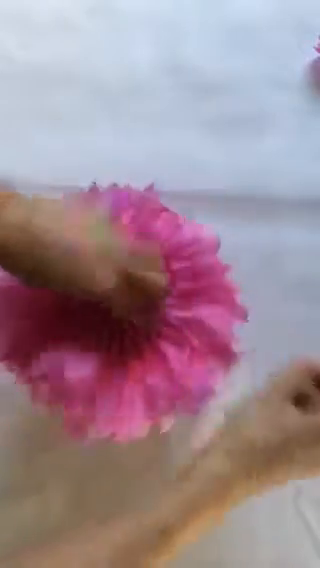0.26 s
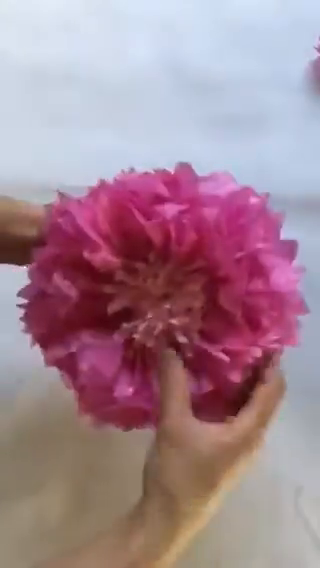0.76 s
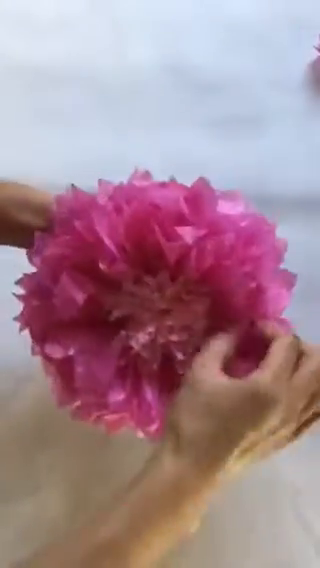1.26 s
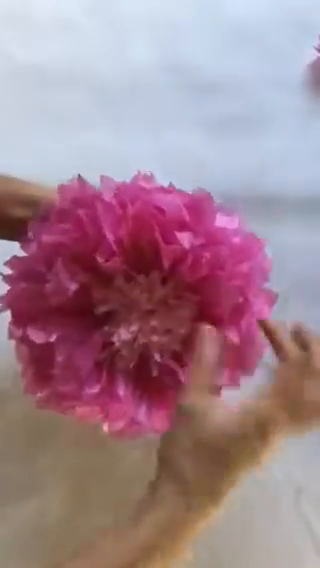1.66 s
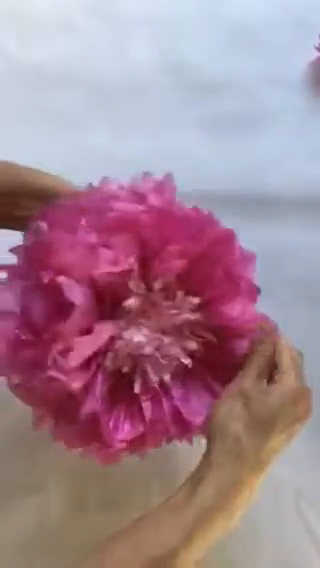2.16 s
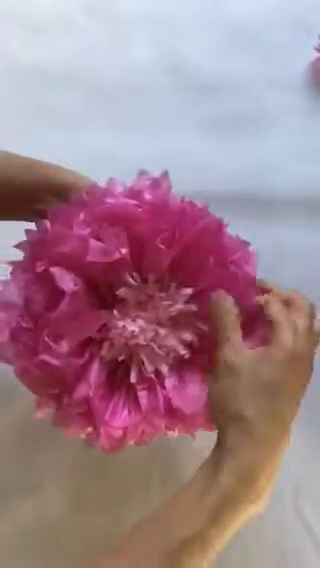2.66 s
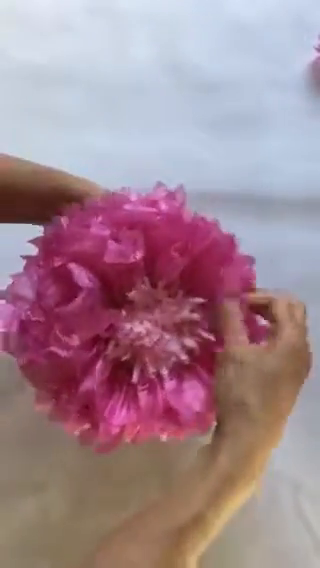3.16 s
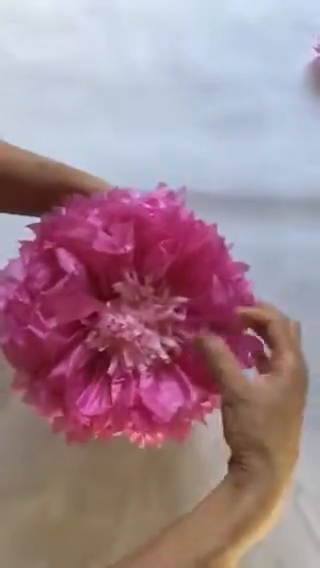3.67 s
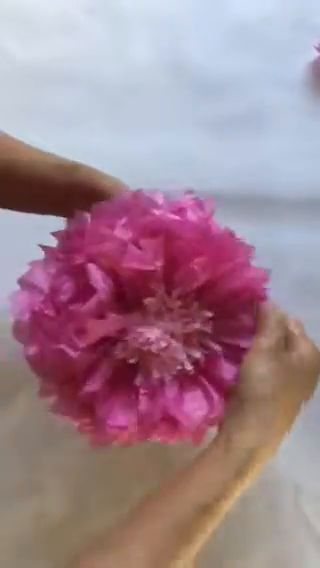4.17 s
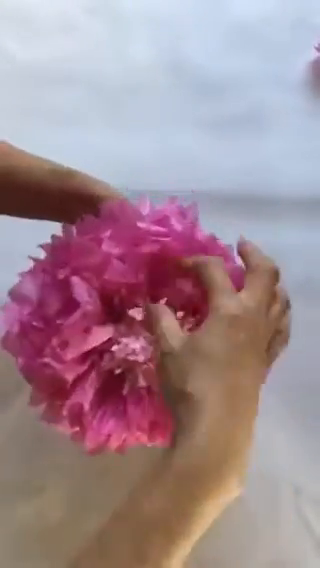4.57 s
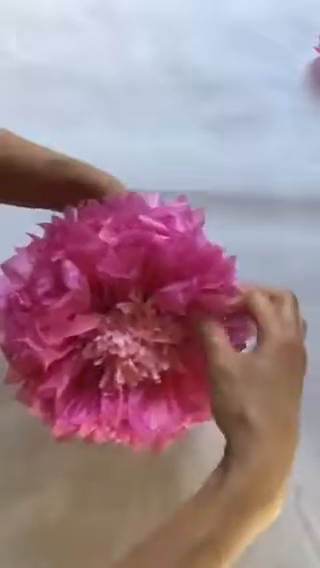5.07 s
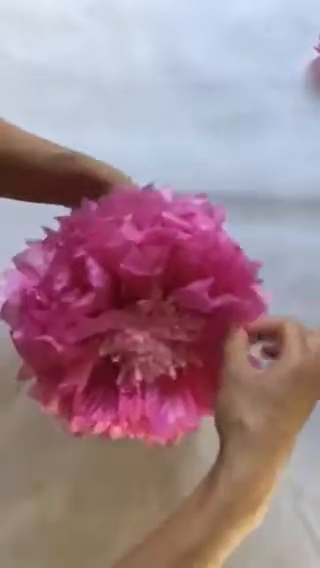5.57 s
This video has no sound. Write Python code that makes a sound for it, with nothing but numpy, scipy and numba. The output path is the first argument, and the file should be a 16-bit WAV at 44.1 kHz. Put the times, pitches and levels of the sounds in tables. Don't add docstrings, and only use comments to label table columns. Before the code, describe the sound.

Thin tissue paper crackles sharply and dryly as fingers pull and fluff its layers, with bright snaps and soft thuds in a small room.

```python
import sys
import numpy as np
from scipy import signal
from scipy.fft import rfft, irfft
from scipy.io import wavfile
from scipy.ndimage import uniform_filter1d, map_coordinates
from numba import njit

SR = 44100
rng = np.random.default_rng(int(sys.argv[2]) if len(sys.argv) > 2 else 0)


def convert_level_to_amplitude(level_db):
    exponent = np.asarray(level_db, float) / 20
    return 10 ** exponent


def dump(signal):
    limited = np.clip(np.atleast_2d(signal).T, -1, 1)
    pcm = np.round(limited * 32767).astype(np.int16)
    wavfile.write(sys.argv[1], SR, pcm)


N = 257103

# (frequency [Hz], density [dB per Hz])
HISS_SPECTRUM = [
    (30, -14),
    (120, -8),
    (240, -1.5),
    (320, -3.5),
    (1100, -5),
    (4800, -22.5),
    (14000, -55),
    (17000, -61),
]
# (time [s], level [dB])
HUM_SWELL = [(0, -68), (.23, -58.5), (.36, -68), (.53, -68.5), (.92, -74), (1.2, -70), (1.32, -73),
             (2.18, -72), (2.32, -67), (2.9, -82), (3.13, -62), (3.41, -70), (3.59, -60.5), (4.01, -73),
             (4.11, -84), (4.37, -60.5), (5.3, -72), (5.83, -60)]
# (frequency [Hz], T60 [s])
ROOM_DECAY = [
    (200, 0.3),
    (1500, 0.99),
    (6000, 0.5),
    (15000, 0.045),
]
# (time [s], peak [dB], pitch [Hz])
BALL_SHIFTS = [(0.191, -69, 258), (0.194, -44, 209), (0.904, -46.5, 253), (1.014, -48.5, 258),
               (0.247, -58, 94), (1.701, -57.5, 182), (1.73, -56.5, 88.5), (1.79, -57.5, 121),
               (1.98, -47.5, 256), (2.088, -58, 188), (2.601, -61, 154.4), (2.754, -56, 227),
               (3.166, -57.5, 233), (3.389, -58, 140), (3.758, -71, 72.7), (4.204, -59, 238.2),
               (4.365, -65, 211), (4.5, -59, 167), (5.32, -49, 272), (5.681, -66, 258)]
# (time [s], peak [dB], pitch [Hz], larger folds relative [dB])
LOUD_CREASES = [(.208, -15, 12000, -20), (.2372, -13, 10600, -8), (.2674, -21, 14200, -9.5),
                (1.3858, -16.5, 14400, -17), (1.443, -16.5, 13300, -30), (1.9402, -24, 12300, 2),
                (1.9976, -13.5, 9900, -18), (2.258, -19, 14800, -22), (2.753, -20.5, 14500, -19),
                (2.7936, -29, 13900, -21), (2.916, -16.5, 11800, -30), (3.291, -25, 14400, -11),
                (3.8082, -17, 15000, -10), (4.0063, -21, 14300, -19), (4.049, -8, 14200, -27),
                (4.0853, -15, 14600, -18), (4.094, -18, 14500, -15), (4.225, -27, 13970, -16),
                (4.267, -16, 14500, -5), (4.6588, -23.5, 12100, 6), (5.044, -19, 12800, -25),
                (5.072, -20.5, 12600, -14), (5.0904, -15, 14000, -9), (5.1223, -16, 14200, -26),
                (5.164, -12, 14300, -16), (5.1915, -16, 14000, -3.5), (5.2096, -15, 13500, -2),
                (5.613, -17, 12800, -22), (5.6665, -29, 14800, -26), (5.69, -26, 14300, -8)]
# (time [s], peak [dB])
LESSER_CREASES = [(.2544, -17), (.289, -15), (.5254, -42), (.782, -38), (0.8123, -26.5), (1.505, -32),
                  (1.559, -15), (1.6848, -52), (1.9013, -30), (2.006, -18), (2.115, -27), (2.2046, -24),
                  (2.519, -48), (2.635, -25), (2.787, -29), (3.308, -20), (3.4002, -18), (3.421, -24),
                  (3.4615, -32), (3.5259, -42), (3.9965, -31), (4.237, -23), (4.5236, -50), (4.7947, -19),
                  (4.8133, -19), (4.8642, -20.5), (4.9391, -23), (5.1587, -13.5), (5.162, -22),
                  (5.343, -34)]
# (time [s], peak [dB], pitch [Hz], larger folds relative [dB])
LONE_CREASES = [(.1377, -30, 14600, -13), (0.396, -15.5, 15000, -27), (0.4258, -22, 14300, -16),
                (0.468, -26, 14000, -1), (.5095, -34, 14600, -12), (0.6052, -34, 9300, -1),
                (0.6758, -35.5, 8000, 3), (.7602, -29.5, 14900, -8), (0.829, -21, 14400, -7.5),
                (1.1242, -28, 14000, -27), (1.745, -43.5, 8100, 8.5), (1.7687, -41.5, 10600, 9.5),
                (1.8015, -32, 12500, -12), (2.4934, -41, 10800, -4), (2.5625, -36, 14300, 0),
                (3.12, -44, 7100, -27), (3.152, -33, 14900, -20), (3.5003, -31, 10500, -6),
                (3.8964, -25, 14800, -17), (3.911, -25, 14600, -20), (3.9705, -24, 13300, -16),
                (4.4086, -29, 14600, -19), (4.441, -32, 14100, -25), (4.467, -30, 13500, -0.5),
                (4.58, -42, 10200, 5), (4.617, -33, 14500, -28), (5.389, -21, 14500, -18),
                (5.4697, -16.5, 12100, -25), (5.5066, -15, 14300, -27), (5.8168, -23.5, 9200, -25)]
# (start [s], length [s], level at the grip [dB], level at letting go [dB])
PULL_MOVES = [(0, 0.15, -57.5, -74), (0.136, 0.031, -53.5, -37.5), (0.178, 0.098, -33, -30),
              (0.329, 0.2, -50, -53), (0.557, 0.32, -57.5, -56), (.836, 0.11, -42.5, -28),
              (0.928, .11, -30, -31.5), (1.249, 0.34, -44.5, -37.5), (1.892, 0.23, -38.5, -38),
              (2.131, 0.13, -41.5, -42), (2.253, 0.11, -43.5, -56), (2.36, 0.074, -40, -40),
              (2.637, 0.091, -38.5, -40.5), (2.744, 0.09, -43.5, -38.5), (2.849, 0.13, -46, -39),
              (3.173, 0.23, -43, -35.5), (3.393, 0.063, -35, -45), (3.717, 0.2, -50, -47.5),
              (3.957, 0.15, -46, -31), (4.056, 0.25, -38.5, -38.5), (4.315, 0.081, -38, -54),
              (4.438, 0.13, -60.5, -65.5), (4.61, 0.15, -41, -37.5), (4.83, .1, -48.5, -47),
              (4.933, 0.06, -49, -36), (5.052, 0.11, -49, -38.5), (5.167, 0.14, -35, -52),
              (5.398, 0.15, -54.5, -38.5), (5.522, 0.092, -38, -33), (5.667, 0.15, -40.5, -48)]
# (time [s], level [dB])
TUG_MOVES = [(.288, -36), (.401, -49), (1.396, -33.5), (1.53, -46), (1.931, -36), (2.1, -34.5),
             (2.802, -36.5), (3.213, -32), (3.335, -33.5), (3.79, -40.5), (3.905, -49), (4.296, -33.5),
             (4.656, -34.5), (4.719, -33), (4.782, -38), (4.885, -43), (5.035, -36), (5.082, -34.5),
             (5.166, -47), (5.332, -39.5), (5.615, -34.5), (5.691, -39)]
# (time [s], depth into the ball [dB], sheets swung [dB])
FINGER_REACH = [(0, 2, -10), (.25, -2, 6.5), (.6, 5, -3.5), (.95, 0.5, 1.5), (1.55, 1.5, 1),
                (1.95, -1, -0.5), (2.3, 3.5, 5), (2.68, -2, -2), (3.08, -1, -0.5), (3.35, 0.5, 2),
                (3.63, -3.5, -10), (3.85, 1.5, 1), (4.05, 1.5, -2), (4.3, 5.5, 5.5), (4.7, -1, -2.5),
                (5.1, -2.5, 0.5), (5.5, 1, -1), (5.83, 1.5, -0.5)]
# (time [s], factor on the scatter of crease sizes [-])
DRYNESS = [
    (0, .8),
    (1.0, .55),
    (1.7, 1.1),
    (2.6, .9),
    (3.3, .75),
    (4.1, 1.0),
    (5.15, 1.45),
    (5.83, 1.1),
]
# (frequency [Hz], density [dB per Hz])
PAPER_VOICE = [(59, -27), (100, -17.5), (204, -7), (291, -8.5), (337, -1), (407, -4), (646, -1.5),
               (780, -6), (1490, 3.5), (2000, -2.5), (2630, 0.5), (4940, -1), (5840, 2.5), (10500, 5),
               (15000, 10)]
FOLD_PITCHES = (330, 1450, 3200, 8000)
FOLD_DULLING = (0.49, 0.2, 0.23)
FOLD_TRIM = (3, 3, 2.95)

HISS_DB = -72
RUMBLE_DB, RUMBLE_SWAY_DB = -74, 1.5
ROOM_DB = -15.5
CREAK_HZ, CREAK_FOLD_DB = 13500, -13
SWARM_MS, LONE_SWARM_MS = 2.5, 4.0
CREASES_PER_S = 9000
TOUCH_DB, TOUCH_DB_PER_S = -12.5, 550
GRIP_DB_PER_S, LET_GO_DB_PER_S = 2000, 707
SETTLE_DB, SETTLE_DB_PER_S = -22, 65
TUG_RISE_DB_PER_S, TUG_FALL_DB_PER_S = 221, 233
TUG_LEAD_S, TUG_TRAIL_S = 0.043, 0.047
USUAL_DB, GENTLE_DB = -38, -58
DEPTH_SHARE = 0.72
TOP_HZ = 15720


def level(x, db):
    return x * convert_level_to_amplitude(db) / np.sqrt(np.mean(x ** 2))


def on_log_hz(hz, table):
    f, v = np.transpose(table)
    return np.interp(np.log(np.maximum(hz, 1)), np.log(f), v)


def colour(x, table):
    size = 4096
    hz = np.arange(size // 2 + 1) * SR / size
    cepstrum = irfft(np.log(convert_level_to_amplitude(on_log_hz(hz, table))))
    cepstrum[1:size // 2] *= 2
    cepstrum[size // 2 + 1:] = 0
    impulse = irfft(np.exp(rfft(cepstrum)))
    return signal.fftconvolve(x, impulse)[:len(x)]


def filtered(x, order, hz, kind):
    return signal.sosfilt(signal.butter(order, hz, kind, fs=SR, output="sos"), x)


def walk(rate):
    hold = max(int(SR / rate), 2)
    steps = np.repeat(rng.standard_normal(N // 8), hold)[:N]
    return uniform_filter1d(steps, hold // 2 + 1)


@njit
def rings(length, start, pole, size):
    out = np.zeros(length)
    for k in range(len(start)):
        z, i = size[k] + 0j, start[k]
        end = min(length, i + int(np.log(300.) / -np.log(abs(pole[k]))) + 1)
        while i < end:
            out[i] += z.real
            z *= pole[k]
            i += 1
    return out


def grains(s, hz, cycles, size):
    hz = np.clip(hz, 50, .45 * SR)
    pole = np.exp((2j * np.pi - 1 / np.clip(cycles, .2, 30)) * hz / SR)
    return rings(N, (s * SR).astype(np.int64), pole, size + 0j)


def background():
    t = np.arange(N) / SR
    hiss = level(colour(rng.standard_normal(N), HISS_SPECTRUM), HISS_DB)
    narrow = filtered(rng.standard_normal(N), 2, [45, 54], "band")
    wide = filtered(rng.standard_normal(N), 2, [58, 125], "band")
    rumble = level(wide, RUMBLE_DB) * convert_level_to_amplitude(RUMBLE_SWAY_DB * walk(8.6))
    hum = level(narrow, -2) + convert_level_to_amplitude(0.5) * np.sin(2 * np.pi * 49 * t)
    hum = hum * convert_level_to_amplitude(np.interp(t, *np.transpose(HUM_SWELL)))
    motor = convert_level_to_amplitude(-76) * np.sin(2 * np.pi * 240 * t)
    return hiss + rumble + hum + motor


def tail(t60_s, length_s):
    t = np.arange(int(length_s * SR)) / SR
    h = rng.standard_normal(len(t)) * np.exp(-np.log(1000) * t / t60_s)
    return h / np.sqrt(np.sum(h ** 2))


def room(x):
    h = 0
    for low in 100 * 2 ** np.arange(0, 7.5, 1.):
        noise = tail(on_log_hz(2.25 * low, ROOM_DECAY), 0.73)
        octave = filtered(noise, 2, [low, min(2 * low, .45 * SR)], "band")
        h = h + octave * np.sqrt(.5 * SR / low)
    h = colour(h, [(100, -23), (22050, 0)])
    h = np.concatenate([np.zeros(int(.004 * SR)), h])
    return convert_level_to_amplitude(ROOM_DB) * signal.fftconvolve(x, h)[:N]


def thuds():
    s, db, hz = np.transpose(BALL_SHIFTS)
    x = grains(s, hz, 1.67, -1j * convert_level_to_amplitude(db + 4.0))
    return filtered(x, 2, 350, "low")


def snaps(count=16, after_db=-4.0, lead=0.051):
    creaks = [(*c, CREAK_HZ, CREAK_FOLD_DB) for c in LESSER_CREASES]
    s, db, hz, fold_db = np.transpose(LOUD_CREASES + creaks + LONE_CREASES)
    in_pull = np.arange(len(s)) < len(s) - len(LONE_CREASES)
    swarm_ms = np.where(in_pull, SWARM_MS, LONE_SWARM_MS)
    u = rng.random((len(s), 1 + 3 * count)).T
    tick = grains(s, hz, 3.9, convert_level_to_amplitude(db - 3.0) * np.exp(2j * np.pi * u[0]))
    late, pitch, turn = u[1:].reshape(3, count, -1)
    late = (1 + lead) * late - lead
    near_hz = 1200 + 15000 * pitch ** .6
    large_db = fold_db + 2.0 + 3 * np.log2(near_hz / 3000)
    fine_db = -6.5 * np.abs(np.log2(near_hz / hz))
    size_db = db + after_db - 9 * np.abs(late) + np.where(near_hz < 5000, large_db, fine_db)
    at = s + swarm_ms * late / 1000
    size = convert_level_to_amplitude(size_db) * np.exp(2j * np.pi * turn)
    swarm = grains(at.ravel(), near_hz.ravel(), 1.08, size.ravel())
    return filtered(tick + swarm, 2, 1100, "high")


def handling(s):
    start, length, first, last = np.transpose(PULL_MOVES)[:, :, None]
    since, after = s - start, s - start - length
    drag = first + (last - first) * np.clip(since / length, 0, 1)
    fade = np.maximum(-LET_GO_DB_PER_S * after, SETTLE_DB - SETTLE_DB_PER_S * after)
    grip = np.maximum(GRIP_DB_PER_S * since, TOUCH_DB + TOUCH_DB_PER_S * since)
    pulls = drag + np.minimum(grip, 0) + np.minimum(fade, 0)
    peak, db = np.transpose(TUG_MOVES)[:, :, None]
    tugs = db + np.minimum(TUG_RISE_DB_PER_S * (s - peak), TUG_FALL_DB_PER_S * (peak - s))
    tugs = tugs + np.minimum(GRIP_DB_PER_S * (s - peak + TUG_LEAD_S), 0)
    tugs = tugs + np.minimum(LET_GO_DB_PER_S * (peak + TUG_TRAIL_S - s), 0)
    return np.maximum(pulls.max(axis=0), tugs.max(axis=0))


def avalanche(count, fade_s):
    u = rng.random((count, 2)).T
    kicks = np.bincount((u[0] * (N - 1)).astype(int), -np.log(u[1] + .01), N)
    stress = signal.lfilter([1], [1, -np.exp(-1 / (fade_s * SR))], kicks)
    x = np.log(stress + .15)
    return (x - x.mean()) / x.std()


def layers(x, pocket_db=2.0):
    hz, s, z = signal.stft(x, SR, nperseg=512, noverlap=384)
    t, depth, swing = np.transpose(FINGER_REACH)
    gentle = USUAL_DB - np.maximum(handling(s), GENTLE_DB)
    reach = [np.interp(s, t, c) for c in (swing, depth, DEPTH_SHARE * depth)]
    rel_db = [r + d * gentle + trim for r, d, trim in zip(reach, FOLD_DULLING, FOLD_TRIM)]
    rel_db = np.array(rel_db + [0 * s])
    place = np.interp(np.log(hz + 1), np.log(np.array(FOLD_PITCHES)), np.arange(len(FOLD_PITCHES)))
    rows, cols = np.meshgrid(place, np.arange(len(s)), indexing="ij")
    gain_db = map_coordinates(rel_db, [rows, cols], order=1)
    pockets = rng.standard_normal((48, 72))
    rows, cols = np.meshgrid(47 * np.sqrt(hz / hz[-1]), 71 * s / s[-1], indexing="ij")
    gain_db = gain_db + pocket_db * map_coordinates(pockets, [rows, cols], order=1)
    return signal.istft(z * convert_level_to_amplitude(gain_db), SR, nperseg=512, noverlap=384)[1][:N]


def crackle(spread_db=2.4, swarm_db=1.7):
    count = int(CREASES_PER_S * N / SR)
    u = rng.random((count, 5)).T
    s = u[0] * (N - 1) / SR
    at = (s * SR).astype(int)
    hz = 120 + 19000 * u[1] ** 2
    cycles = 0.98 * (.5 + u[2])
    small = np.clip(0.34 + np.log2(hz / 1700) / 6, 0, 1)
    slip_db = 1.2 * walk(40)[at]
    luck = -np.log(u[3] + .015)
    burst_db = swarm_db * avalanche(count=900, fade_s=0.0052)[at]
    scatter_db = burst_db + slip_db + spread_db * (luck - 1)
    chance_db = spread_db + np.interp(s, *np.transpose(DRYNESS)) * scatter_db
    size_db = handling(s) + small * chance_db
    even = np.sqrt(hz / cycles * u[1] / SR)
    x = grains(s, hz, cycles, convert_level_to_amplitude(size_db + 10.0) * even * np.exp(2j * np.pi * u[4]))
    return layers(colour(x, PAPER_VOICE))


def scene():
    paper = crackle() + snaps() + thuds()
    return (paper + room(paper) + background())[None, :]


def top_cut(x):
    return signal.sosfilt(signal.butter(12, 16970, fs=SR, output="sos"), x)


def record(dry):
    body = signal.sosfiltfilt(signal.ellip(9, .1, 40, TOP_HZ, fs=SR, output="sos"), dry)
    power = uniform_filter1d(dry ** 2, 64)
    before = uniform_filter1d(dry ** 2, 512, origin=255)
    attack = uniform_filter1d(1. * (power > 9 * before), 400) > 0
    top = (dry - body) * uniform_filter1d(1. * attack, 128)
    return top_cut(body + convert_level_to_amplitude(-31) * top)


dry = scene()
out = record(dry)
dump(out)
```